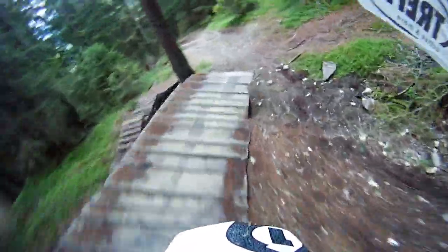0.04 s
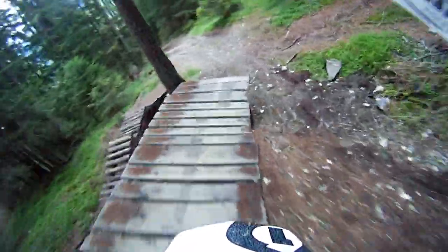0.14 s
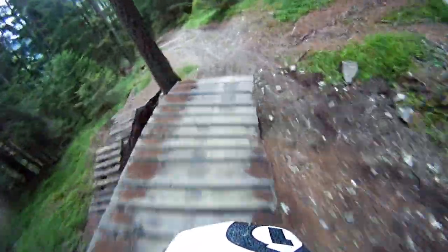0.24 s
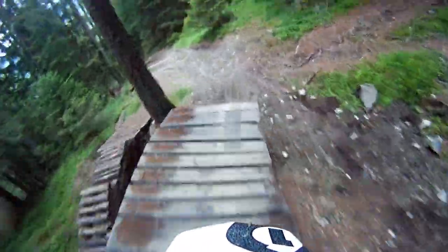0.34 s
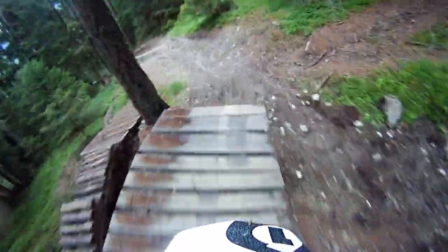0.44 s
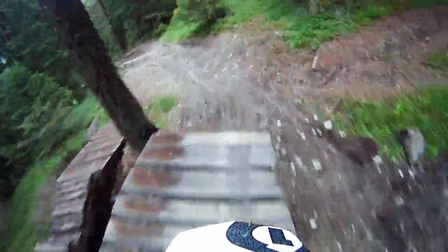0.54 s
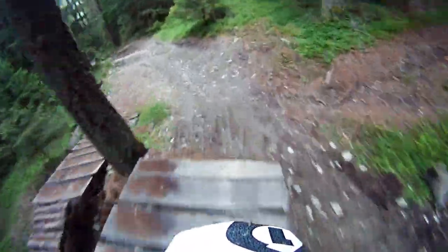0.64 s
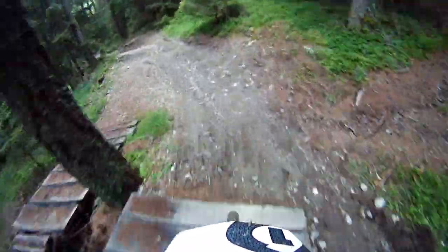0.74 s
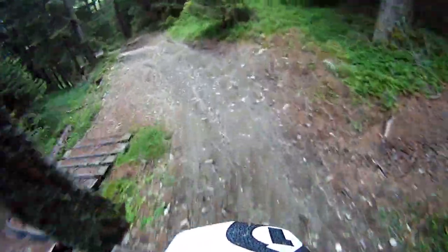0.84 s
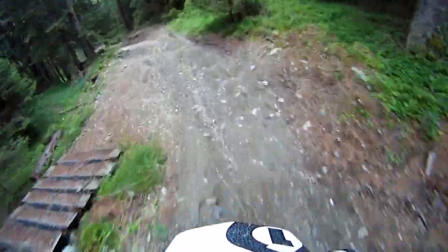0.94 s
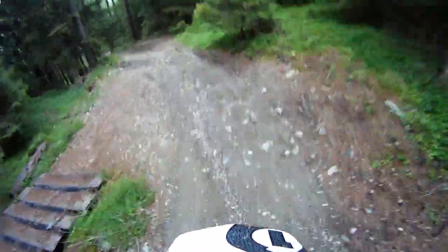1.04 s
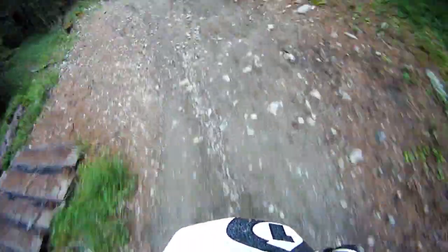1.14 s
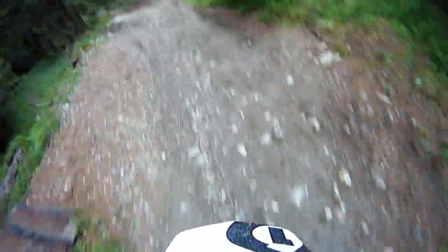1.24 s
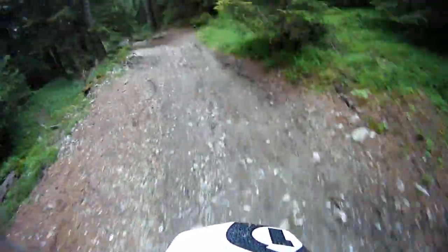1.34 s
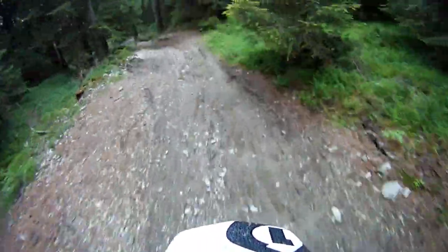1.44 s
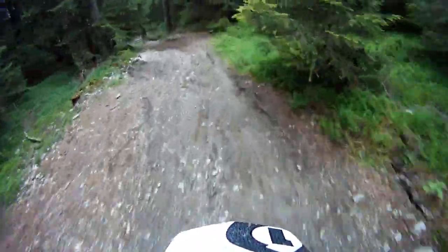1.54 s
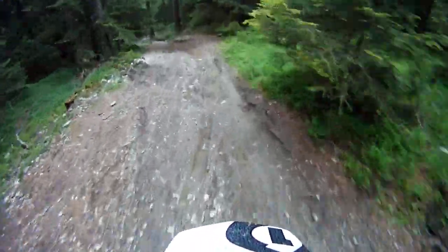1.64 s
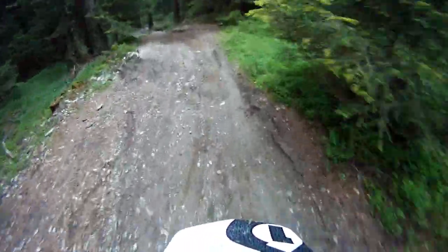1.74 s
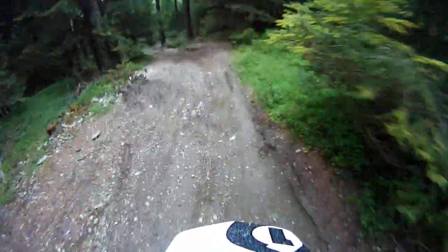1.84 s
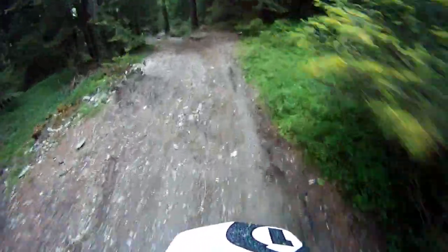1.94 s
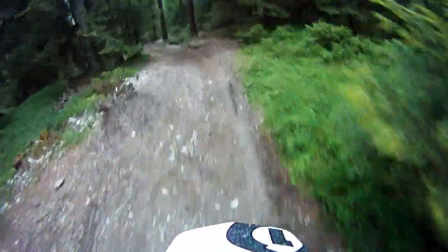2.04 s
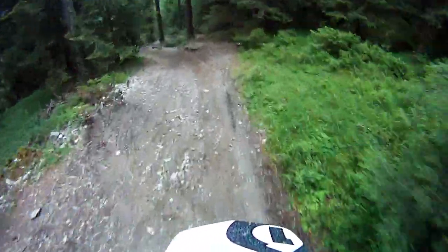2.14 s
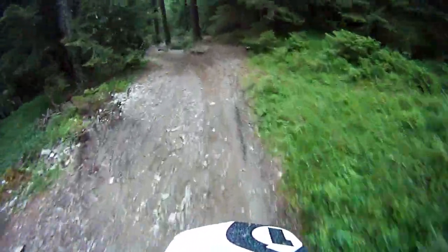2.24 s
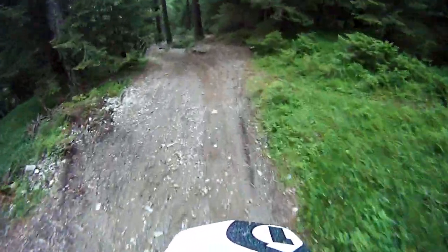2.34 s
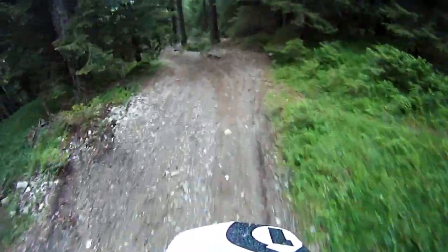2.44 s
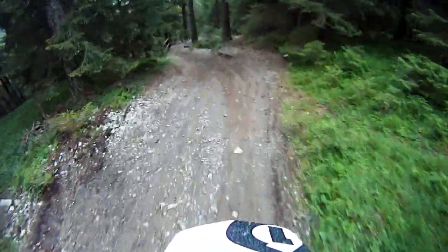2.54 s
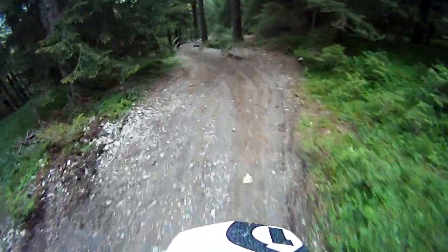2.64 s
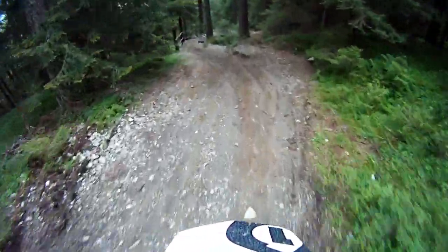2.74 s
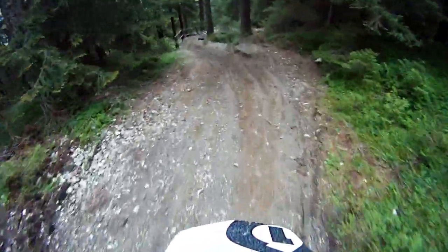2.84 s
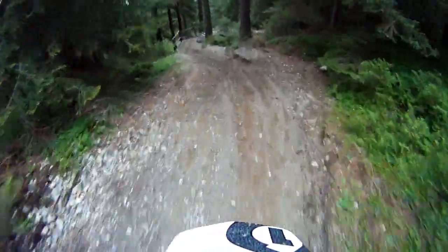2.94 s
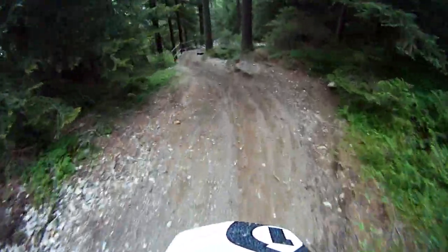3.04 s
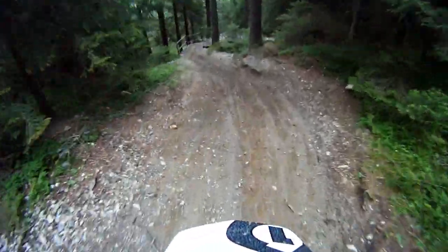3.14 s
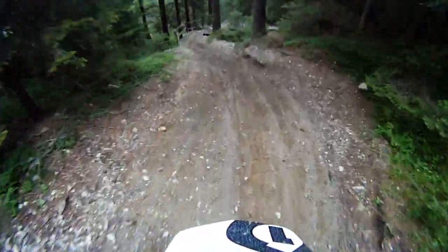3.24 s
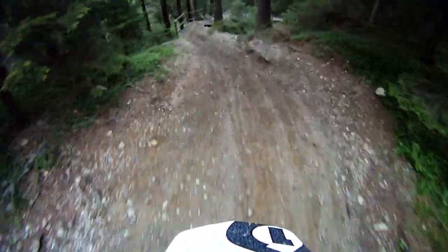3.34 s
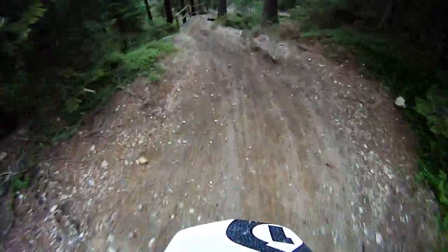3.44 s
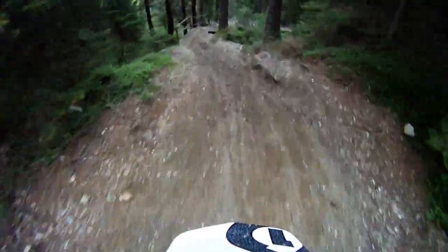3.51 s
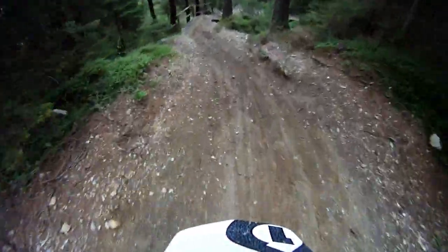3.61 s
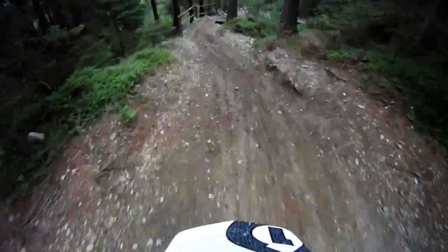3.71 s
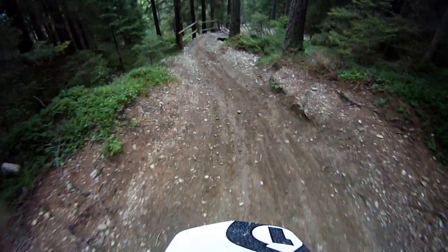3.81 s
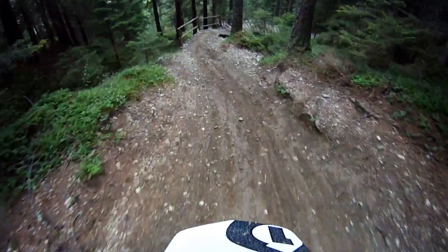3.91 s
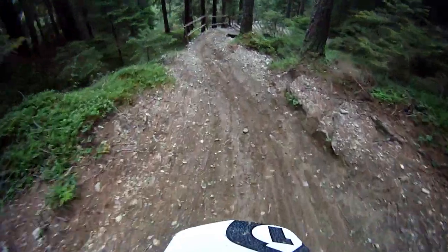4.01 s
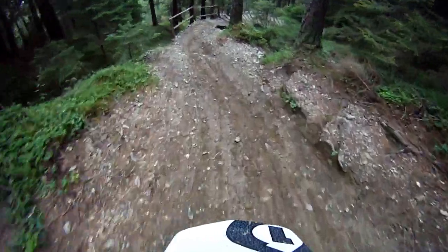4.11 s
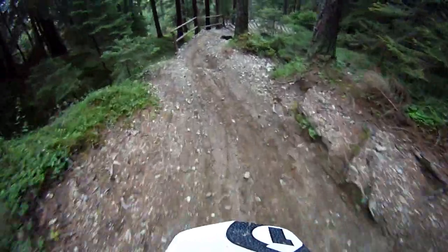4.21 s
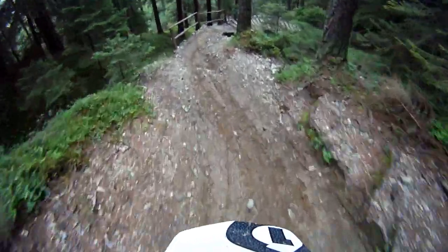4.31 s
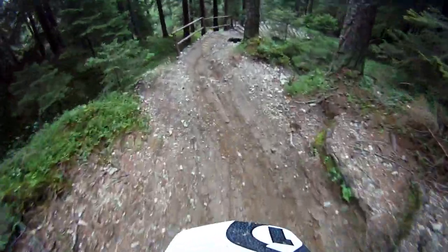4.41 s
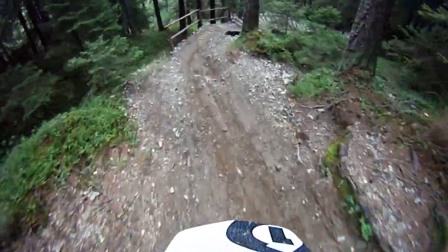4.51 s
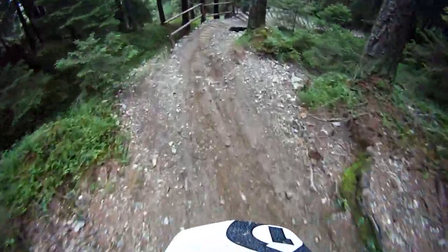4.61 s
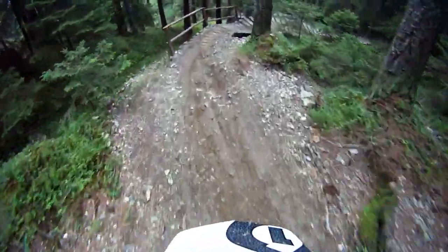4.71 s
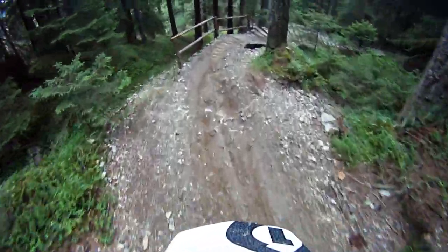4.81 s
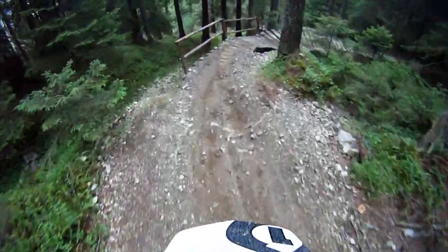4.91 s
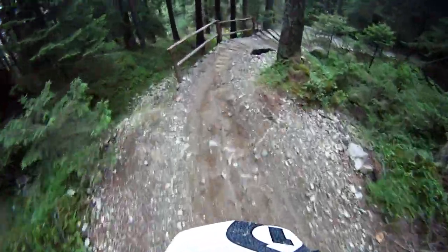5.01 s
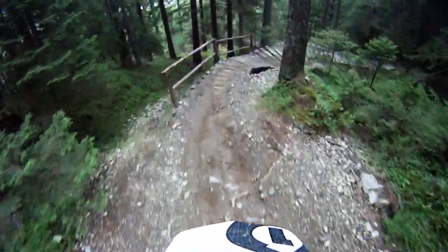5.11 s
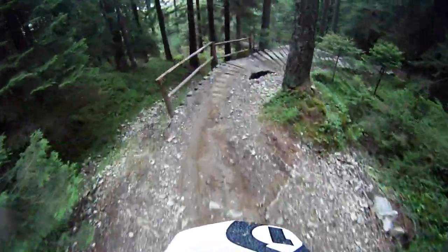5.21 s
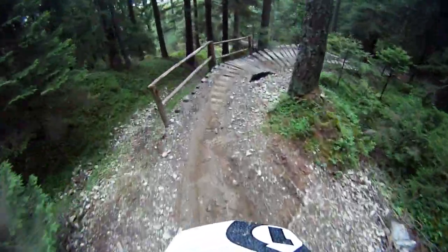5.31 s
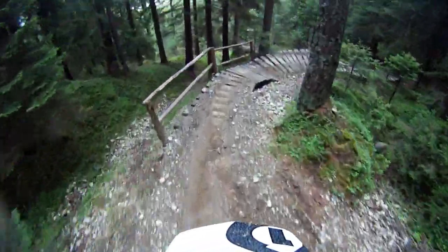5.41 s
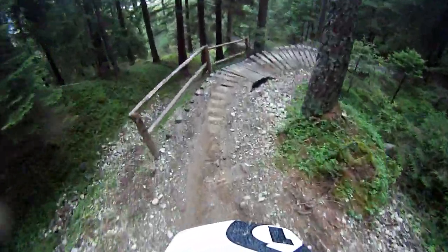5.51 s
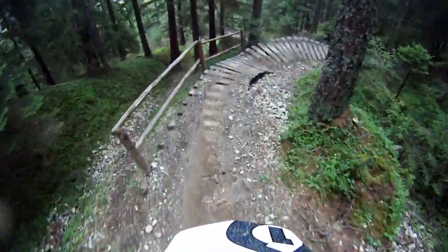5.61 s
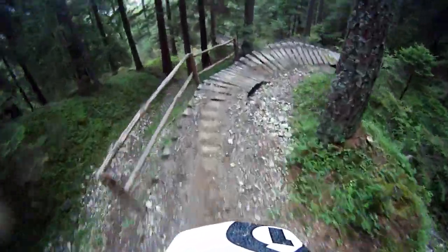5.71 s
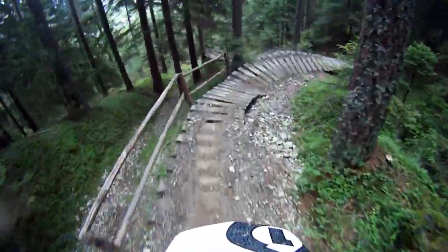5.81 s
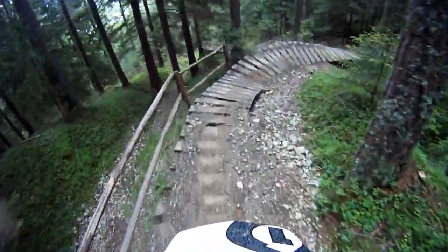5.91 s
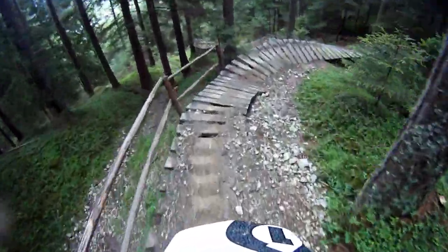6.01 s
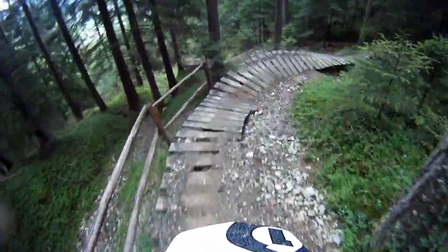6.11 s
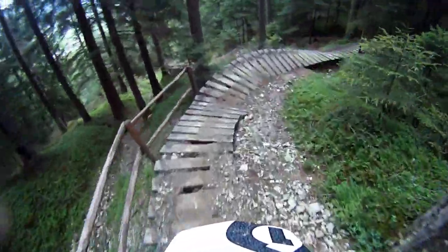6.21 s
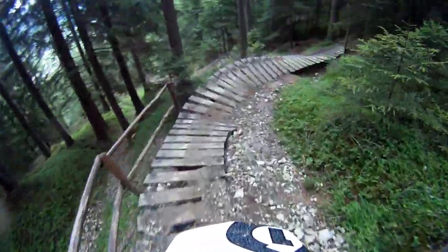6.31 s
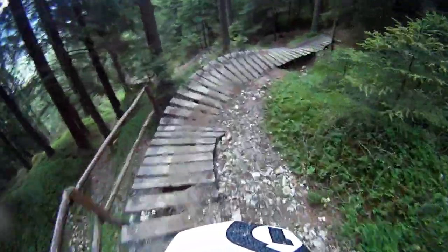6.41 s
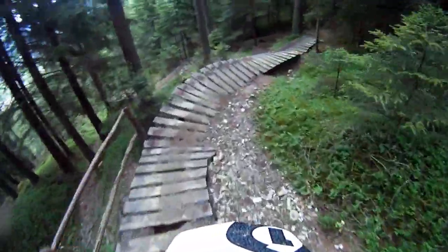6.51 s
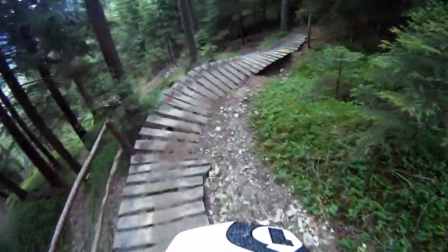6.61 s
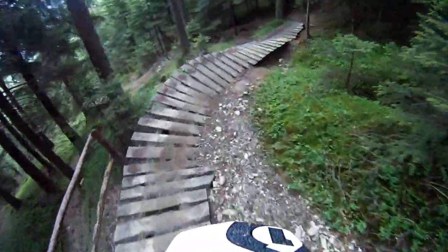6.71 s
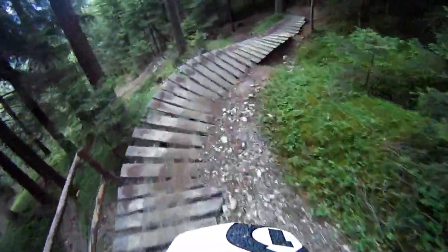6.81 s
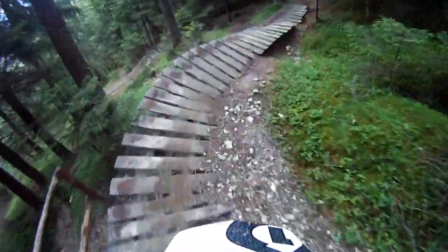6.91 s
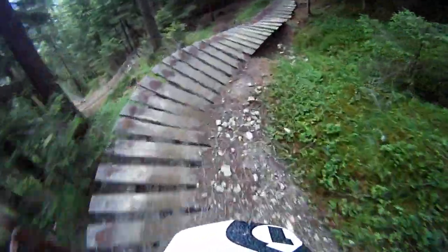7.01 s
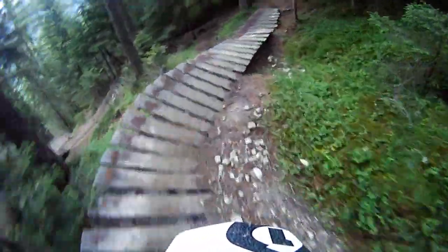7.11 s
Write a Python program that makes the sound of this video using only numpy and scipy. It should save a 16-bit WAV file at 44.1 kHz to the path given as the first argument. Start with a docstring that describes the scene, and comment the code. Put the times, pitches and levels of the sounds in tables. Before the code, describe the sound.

Close helmet microphone on a mountain bike outdoors in forest. Soft, quick ribbed bumps over a wooden ramp, a brief lull, then a loud clack of landing with two low thuds. Tyres crunch gravel, chain and frame rattle, stones clink and air rumbles. A ringing knock comes a second later; the ride grows quieter before wooden planks boom and clatter at the end.

```python
"""A mountain bike, heard from the rider's helmet, drops off a wooden ramp, lands with a clack and two low
thuds, and runs down a gravel trail onto a boardwalk. Parts are noise contacts driven through resonances.
One jolt signal shakes the helmet, loads the tyres and rattles chain and frame. Tyres crunch over grit and
flick stones, the hub rings, and air rumbles past the microphone as shaped, fluttering noise."""
import sys
import numpy as np
from scipy import signal
from scipy.fft import rfft, irfft, next_fast_len
from scipy.io import wavfile
from scipy.ndimage import uniform_filter1d

SR = 44100
rng = np.random.default_rng(int(sys.argv[2]) if len(sys.argv) > 2 else 0)


def to_wav(sig):
    """Store sig (one row per channel, or 1-D mono) as 16-bit WAV at the path in sys.argv[1].

    Samples outside -1..1 are clipped; the rate is SR.
    """
    pcm = np.clip(np.atleast_2d(sig), -1, 1) * 32767
    pcm = np.round(pcm).astype(np.int16)
    wavfile.write(sys.argv[1], SR, pcm.T)  # frames by channels


N = 315315
T = np.arange(N) / SR

# Table columns: level_db is final at its source; rel_db is scaled or normalised later.
# half_power_s is the time between a swell's half-power points.


def from_db(db):
    """Decibels to gain."""
    return 10 ** (np.asarray(db) / 20)


def rms_one(x):
    """Scale to unit power."""
    return x / np.sqrt(np.mean(x ** 2) + 1e-20)


def gains(rows):
    """Each dB column of a curve as a gain per sample."""
    s, *columns = np.transpose(rows)
    return [from_db(np.interp(T, s, column)) for column in columns]


def swells(rows, skirt):
    """Amplitude of a row of shakes; each rises and falls about its peak, and their powers add."""
    power = np.zeros(N)
    for peak_s, level_db, half_power_s in rows:
        first = max(int((peak_s - 6 * half_power_s) * SR), 0)
        near = slice(first, int((peak_s + 6 * half_power_s) * SR))
        distance = np.abs(2 * (T[near] - peak_s) / half_power_s)
        power[near] += from_db(level_db) ** 2 * .5 ** (distance ** skirt)
    return np.sqrt(power)


def tilt(x, spectrum):
    """Pass a sound through a smooth frequency response that falls away beyond its ends."""
    hz, db = np.transpose(spectrum)
    size = next_fast_len(N)
    log_hz = np.log(np.maximum(np.arange(size // 2 + 1) * SR / size, 1))
    beyond = np.abs(log_hz - np.clip(log_hz, np.log(hz[0]), np.log(hz[-1])))
    response = from_db(np.interp(log_hz, np.log(hz), db)) * np.exp(-2 * beyond)
    return irfft(rfft(x, size) * response, size)[..., :N]


def colour(x, spectrum):
    """Give a noise a spectrum and unit power."""
    return rms_one(tilt(x, spectrum))


def resonate(x, modes, direct_db):
    """Dense contacts drive many resonances, whose powers add to a share of the bare contact."""
    size = next_fast_len(N)
    f = np.arange(size // 2 + 1) * SR / size
    power = from_db(direct_db) ** 2
    for hz, width_hz, rel_db in modes:
        power = power + (from_db(rel_db) / (1 + (2 * (f - hz) / width_hz) ** 2)) ** 2
    return rms_one(irfft(rfft(x, size) * np.sqrt(power), size)[..., :N])


def smooth_power(x, span_s):
    """Running mean power, smoothed twice."""
    size = max(int(span_s * SR), 2)
    return uniform_filter1d(uniform_filter1d(x ** 2, size), size)


def steady(x, span_s):
    """Even out the power, so that the driving force sets the level."""
    return x / np.sqrt(smooth_power(x, span_s) + 1e-9)


def turbulence():
    """Two unrelated white noises: common to both ports, and differing between them."""
    return rng.standard_normal((2, N))


def grains(per_s, spread_db):
    """Tiny contacts at random moments, a few far stronger (weaker if spread_db < 0) than the rest."""
    born = rng.random(N) < per_s / SR
    strength = from_db(spread_db * np.minimum(rng.exponential(1, N), 4))
    return rms_one(born * strength * turbulence())


def flutter(depth_db, step_s):
    """A gain that wanders at random from one moment to the next."""
    steps = rng.standard_normal(4000)
    return from_db(depth_db * np.interp(T / step_s, np.arange(len(steps)), steps))


def scattered(per_s, half_power_s, spread_db):
    """Amplitude of small shakes that come at random moments."""
    gap, force = rng.random(size=(150, 2)).T
    when = np.cumsum((.5 + gap) / per_s)
    rows = [(s, -spread_db * f, half_power_s) for s, f in zip(when, force) if s < N / SR]
    return swells(rows, skirt=2)


def pings(rows, rise_s, ring_s, overtone_db, width_hz):
    """Each ping swells in softly and rings roughly, at its pitch and at a few unrelated partials."""
    out = np.zeros((2, N))
    t = np.arange(-SR // 25, SR // 16) / SR
    shape = np.exp(np.minimum(t / rise_s, -t / ring_s))
    for peak_s, level_db, pitch_hz in rows:
        partials_hz = pitch_hz * np.r_[1, rng.uniform(.7, 1.6, size=4)]
        sizes = from_db(np.r_[0, np.full(4, overtone_db)])
        # a wandering phase widens each partial
        wander = np.cumsum(rng.standard_normal((len(partials_hz), len(t))), axis=1)
        wander = uniform_filter1d(wander * np.sqrt(2 * np.pi * width_hz / SR), size=64)
        waves = np.exp(2j * np.pi * partials_hz[:, None] * t + 1j * wander)
        weights = sizes * np.exp(2j * np.pi * rng.random((2, len(partials_hz))))
        ring = from_db(level_db) * shape * (weights @ waves).real
        at = int(peak_s * SR) + np.round(t * SR).astype(int)
        inside = (at >= 0) & (at < N)
        out[:, at[inside]] += ring[:, inside]
    return out


# big bumps that shake the helmet: peak_s, rel_db, half_power_s
BUMPS = [(0.165, -50, 0.028), (0.28, -46.5, 0.021), (0.33, -52, 0.023), (0.496, -48, 0.025),
         (0.644, -51.5, 0.025), (0.701, -47, 0.021), (1.12, -36.5, 0.028), (1.174, -35.5, 0.027),
         (1.379, -40.5, 0.0067), (1.427, -42, 0.0082), (1.635, -41.5, 0.02), (1.775, -37, 0.025),
         (1.846, -42, 0.062), (1.935, -41, 0.019), (2.001, -38.5, 0.0078), (2.042, -39, 0.029),
         (2.135, -46, 0.044), (2.307, -49.5, 0.062), (2.371, -47, 0.015), (2.634, -41, 0.037),
         (2.733, -42, 0.02), (2.786, -41.5, 0.015), (2.905, -39, 0.039), (3.04, -43.5, 0.031),
         (3.149, -43, 0.058), (3.235, -37, 0.051), (3.48, -43, 0.042), (3.613, -38.5, 0.02),
         (3.655, -39, 0.038), (3.708, -40, 0.03), (3.756, -43.5, 0.018), (3.853, -41, 0.02),
         (3.915, -45.5, 0.02), (4.012, -44, 0.01), (4.119, -40, 0.029), (4.181, -42, 0.01),
         (4.267, -48, 0.024), (4.526, -38.5, 0.017), (4.581, -41, 0.0055), (4.641, -45.5, 0.013),
         (4.964, -45.5, 0.023), (5.02, -51.5, 0.03), (5.478, -52.5, 0.027), (5.549, -53.5, 0.015),
         (5.776, -46, 0.01), (5.925, -41, 0.014), (6.088, -55.5, 0.028), (6.605, -52, 0.026)]
# evenly spaced ribs, on the ramp and before the boardwalk: first_s, last_s, spacing_s, rel_db
RIBS = [(0.09, 0.82, 0.0695, -54), (5.785, 6.21, 0.0514, -52.5)]
RIB_HALF_POWER_S = .019
SMALL_BUMPS_PER_S, SMALL_BUMP_HALF_POWER_S = 7.1, .016
SMALL_BUMP_RE_RUSH_DB = 3.5   # strongest small bump, relative to the AIR rush column


def jolts():
    """How hard the trail hits the wheels: big bumps, rows of ribs and small random bumps."""
    rush = gains(AIR)[2]
    ribs = [(s, rel_db, RIB_HALF_POWER_S) for first_s, last_s, spacing_s, rel_db in RIBS
            for s in np.arange(first_s, last_s, spacing_s)]
    small = scattered(SMALL_BUMPS_PER_S, SMALL_BUMP_HALF_POWER_S, spread_db=4)
    small = from_db(SMALL_BUMP_RE_RUSH_DB) * rush * small
    return np.hypot(swells(BUMPS + ribs, skirt=1.8), small)


USUAL_JOLT_DB = -45   # a steady jolt of this size yields level_db in shaken()


def shaken(jolt, level_db, span_s, follows):
    """A part's motion: jolts spread over its response time; follows < 1 cushions hard ones."""
    power = smooth_power(jolt, span_s) / from_db(USUAL_JOLT_DB) ** 2
    return from_db(level_db) * np.maximum(power, 1e-12) ** (follows / 2)


# air past the helmet between bumps: time_s, sway_rel_db, gust_rel_db, rush_rel_db
AIR = [(0.0, -41, -58, -63), (0.46, -32, -53, -63.5), (0.9, -44.5, -56, -61.5), (1.15, -42, -47, -52),
       (1.57, -41, -51, -57), (1.89, -61, -49, -62), (2.29, -39, -52.5, -60), (3.05, -33.5, -47.5, -57),
       (3.44, -34.5, -52, -62.5), (3.76, -42, -53, -60.5), (4.22, -47.5, -52, -66),
       (4.98, -42.5, -58.5, -64), (5.26, -49.5, -57, -62), (5.77, -43, -55.5, -67.5),
       (5.93, -40.5, -66, -75), (6.39, -49, -59, -63), (6.79, -40, -54, -62.5), (7.15, -30.5, -41, -51.5)]
# spectra of the three air layers: freq_hz, rel_db_per_hz
SWAY_COLOUR = [(10, -12.5), (19, -2.5), (28, -0.5), (38, -15.5), (55, -12.5), (80, -29.5), (140, -55)]
GUST_COLOUR = [(35, -16), (62, -2), (90, -6.5), (130, -12.5), (200, -23.5), (400, -60)]
RUSH_COLOUR = [(70, -12.5), (160, -9), (280, -7), (500, -15.5), (1000, -15.5), (1600, -22), (2600, -34),
               (3200, -32.5), (6000, -35.5), (14000, -47)]


def wind(jolt):
    """Slow sway of the helmet, gusts on the ports and a rush of air; every jolt raises all three."""
    sway, gust, rush = gains(AIR)
    sway = np.hypot(from_db(-.5) * sway, shaken(jolt, level_db=-32.5, span_s=.058, follows=1))
    gust = np.hypot(from_db(-2.5) * gust, shaken(jolt, level_db=-48.5, span_s=.028, follows=.95))
    rush = np.hypot(from_db(.5) * rush, shaken(jolt, level_db=-58.5, span_s=.075, follows=.49))
    eddies = flutter(depth_db=2.5, step_s=.018)
    sway_noise = steady(colour(turbulence(), SWAY_COLOUR), span_s=.078)
    gust_noise = steady(colour(turbulence(), GUST_COLOUR), span_s=.0077)
    low = sway * flutter(depth_db=3.5, step_s=.05) * sway_noise
    gusts = gust * flutter(depth_db=3.5, step_s=.026) * gust_noise
    air = rush * colour(grains(per_s=4600, spread_db=1), RUSH_COLOUR)
    return low + eddies * (gusts + air)


# ring of the coasting hub: time_s, rel_db
HUB = [(0, -70.5), (1.5, -64.5), (2.5, -65.5), (3.1, -61), (3.8, -65), (4.2, -66), (4.32, -60), (4.55, -59),
       (4.85, -64.5), (5.12, -65), (5.4, -70), (5.75, -64.5), (6.4, -72), (7.15, -73)]
# hub resonances: freq_hz, width_hz, rel_db
HUB_MODES = [(1998, 150, 1), (2210, 150, -5)]


def freewheel():
    """Dense pawl contacts ring the coasting hub's resonances in a quick, uneven flutter."""
    ring, = gains(HUB)
    pawls = resonate(grains(per_s=1500, spread_db=1), HUB_MODES, direct_db=-61.5)
    unevenness = flutter(depth_db=2.6, step_s=.018)
    return from_db(1.5) * ring * unevenness * steady(pawls, span_s=.046)


# larger stones flicked against the bike: peak_s, rel_db, pitch_hz
STONES = [(1.25, -53, 2090), (1.262, -54, 2410), (1.341, -51, 980), (1.858, -47, 1174),
          (1.866, -48.5, 1970), (2.183, -53, 1394), (3.431, -53, 1930), (3.608, -53, 1100),
          (4.034, -49.5, 1467), (4.522, -49.5, 1920), (5.172, -56, 1280), (5.75, -60, 1607),
          (5.912, -56.5, 2210)]


def stones():
    """Larger stones clink on rims and frame as short clusters of broadened partials."""
    return from_db(4) * pings(STONES, rise_s=.014, ring_s=.014, overtone_db=-7, width_hz=36)


# tyre crunch set by the ground: time_s, rel_db
GROUND = [(0.0, -71), (0.14, -67), (0.3, -68), (0.69, -69.5), (0.96, -61), (1.19, -59), (1.41, -63),
          (1.95, -61.5), (2.27, -59.5), (3.92, -59), (5.28, -64.5), (5.99, -68), (6.49, -67), (7.15, -61.5)]
# spectra of tread and grit: freq_hz, rel_db_per_hz
TYRE_COLOUR = [(700, -29), (1400, -6.5), (1750, -1), (2020, 1), (2250, -3), (2550, -0.5), (2900, -12),
               (3250, -21.5), (3700, -11.5), (4300, -26.5), (9000, -40)]
GRIT_COLOUR = [(2000, -24), (3000, 8.5), (3700, 9), (4300, 2), (5000, 0.5), (5900, -12.5), (7100, -1.5),
               (9000, 2), (10000, 9.5), (10600, -2.5), (12600, -11.5), (13500, 1), (14100, 5.5),
               (14700, -32.5)]
LOAD_CRUNCH_DB = -65.5   # extra crunch as the tyre presses into a usual bump
TICKS_PER_S, TICK_RE_CRUNCH_DB = 90, -13.5   # single bits of gravel cracking


def tyres(jolt):
    """Knobs crush dirt in uneven bites; the crunch sprays grit, cracks gravel and clinks pebbles."""
    crunch, = gains(GROUND)
    crunch = np.hypot(crunch, shaken(jolt, level_db=LOAD_CRUNCH_DB, span_s=.022, follows=.82))
    bites = flutter(depth_db=1.26, step_s=.073)
    tread = from_db(-.5) * colour(grains(per_s=6100, spread_db=-3.5), TYRE_COLOUR)
    spray = from_db(-4.5) * colour(grains(per_s=9700, spread_db=-.5), GRIT_COLOUR)
    ticks = resonate(grains(per_s=TICKS_PER_S, spread_db=1), FRAME_MODES, direct_db=-33)
    ticks = from_db(TICK_RE_CRUNCH_DB) * ticks
    when, force, bulk = rng.random(size=(200, 3)).T
    pebbles = np.c_[when * N / SR, -11 * force, 1100 * 2.3 ** bulk]   # peak_s, rel_db, pitch_hz
    clinks = from_db(4) * pings(pebbles, rise_s=.004, ring_s=.0061, overtone_db=-10, width_hz=21)
    return crunch * (bites * (tread + spray) + ticks + clinks)


# big shakes of chain and frame: peak_s, rel_db, half_power_s
RATTLES = [(0.221, -54.5, 0.03), (0.39, -58, 0.076), (0.897, -59.5, 0.021), (1.253, -56, 0.019),
           (1.345, -48, 0.035), (1.417, -56.5, 0.022), (1.489, -57.5, 0.018), (1.62, -56, 0.055),
           (1.697, -49.5, 0.03), (1.858, -46.5, 0.024), (2.351, -53, 0.013), (2.545, -55.5, 0.049),
           (2.64, -54, 0.042), (2.738, -52.5, 0.031), (3.022, -50, 0.018), (3.126, -48.5, 0.023),
           (3.268, -48, 0.032), (3.427, -53, 0.033), (3.564, -54, 0.067), (3.838, -51.5, 0.027),
           (4.034, -48.5, 0.044), (4.299, -61, 0.011), (4.41, -58, 0.023), (4.47, -56, 0.036),
           (4.96, -60, 0.023), (5.168, -63, 0.034), (5.389, -62.5, 0.028), (5.502, -56.5, 0.055),
           (5.787, -52.5, 0.054), (5.91, -62, 0.045), (6.13, -63.5, 0.11), (6.598, -62, 0.037),
           (6.683, -59, 0.03), (6.768, -58, 0.047), (6.932, -51, 0.09), (7.037, -53, 0.026)]
# frame resonances: freq_hz, width_hz, rel_db
FRAME_MODES = [(1580, 94, 2.5), (2295, 820, 4.5), (3680, 410, 5.5), (4940, 730, 0.5), (6980, 720, -2.5),
               (8380, 290, 0), (9720, 1000, -7), (13600, 500, -11.5)]
FLURRIES_PER_S, FLURRY_RE_CRUNCH_DB, FLURRY_HALF_POWER_S = 7, -4, .025   # small shakes


def rattle(jolt):
    """Chain and cables chatter on the frame in big shakes, small flurries and with every jolt."""
    crunch, = gains(GROUND)
    chatter = resonate(grains(per_s=15000, spread_db=2.2), FRAME_MODES, direct_db=-38)
    big = swells(RATTLES, skirt=3)
    flurries = scattered(FLURRIES_PER_S, FLURRY_HALF_POWER_S, spread_db=10.5)
    flurries = from_db(FLURRY_RE_CRUNCH_DB) * crunch * flurries
    jolted = shaken(jolt, level_db=-66.5, span_s=.03, follows=.58)
    return from_db(-.5) * np.sqrt(big ** 2 + flurries ** 2 + jolted ** 2) * chatter


# wheels on the boardwalk planks: peak_s, level_db, half_power_s
PLANKS = [(6.857, -41.5, 0.03), (6.928, -36.5, 0.027), (6.986, -40.5, 0.01), (7.034, -35.5, 0.031),
          (7.145, -39, 0.024)]
# plank resonances: freq_hz, width_hz, rel_db
PLANK_MODES = [(114, 52, 2.5), (160, 51, 8.5), (345, 200, -8), (712, 90, -6.5), (940, 130, -7.5),
               (1130, 110, -11.5), (1300, 160, -10), (1590, 120, -8.5), (1920, 90, -12), (2180, 180, -12.5),
               (2480, 130, -8.5), (3680, 190, -12.5)]


def boardwalk():
    """Each plank booms and clatters as contacts under the wheels drive its resonances."""
    wood = resonate(grains(per_s=3500, spread_db=2.5), PLANK_MODES, direct_db=-32)
    return swells(PLANKS, skirt=1.77) * steady(wood, span_s=.014)


# spectrum of a bump: freq_hz, rel_db_per_hz
BUMP_COLOUR = [(40, -20.5), (90, 2.5), (170, 5), (260, -6.5), (450, -10.5), (750, -14.5), (1200, -18),
               (2000, -22), (3000, -28), (6000, -35), (14000, -37)]


def bumps(jolt):
    """Each bump gives a dull, gritty puff that swells and fades softly."""
    puff = steady(colour(grains(per_s=6000, spread_db=2.5), BUMP_COLOUR), span_s=.0059)
    return from_db(-2) * jolt * puff


# suspension takes the weight: peak_s, level_db, half_power_s, pitch_hz
THUDS = [(1.127, -28, 0.0053, 191.1), (1.134, -23, 0.006, 165)]


def thuds():
    """After the landing the bike gives two low, round swings: sines under short swells."""
    out = np.zeros((2, N))
    for peak_s, level_db, half_power_s, pitch_hz in THUDS:
        phase = rng.uniform(0, 2 * np.pi, (2, 1))
        swing = np.sqrt(2) * np.sin(2 * np.pi * pitch_hz * T + phase)
        out += swells([(peak_s, level_db, half_power_s)], skirt=1.7) * swing
    return out


# loose part knocking on the trail: peak_s, rel_db, half_power_s
KNOCK = [(2.052, -46, 0.0086), (2.064, -26, 0.0058), (2.075, -25, 0.0056), (2.090, -42.5, 0.018)]
# its resonances: freq_hz, width_hz, rel_db
KNOCK_MODES = [(904, 120, -8.5), (1134, 83, -0.5), (1570, 300, -9.5), (1970, 120, -9.5), (2260, 90, -10),
               (2490, 220, -11.5), (3030, 210, -11), (3320, 71, -15), (3630, 370, -13.5),
               (8380, 280, -19.5), (9500, 1200, -25), (10840, 110, -17), (12900, 150, -20),
               (14200, 900, -26)]
# its ring: peak_s, level_db, pitch_hz
KNOCK_RING = [(2.064, -25, 1085)]


def loose_part():
    """A loose part slaps in a tight cluster of contacts and rings on."""
    knock = resonate(grains(per_s=14000, spread_db=3), KNOCK_MODES, direct_db=-42)
    knock = from_db(-3) * swells(KNOCK, skirt=.87) * steady(knock, span_s=.0051)
    ring = pings(KNOCK_RING, rise_s=.0058, ring_s=.011, overtone_db=-24, width_hz=5.6)
    return knock + ring


# hard contacts of the landing: peak_s, level_db, half_power_s
LANDING = [(1.028, -34, 0.019), (1.0425, -21, 0.011), (1.0505, -9, 0.0069), (1.0585, -9.5, 0.0024),
           (1.067, -10.5, 0.0052), (1.074, -22.5, 0.0052), (1.082, -23, 0.003)]
# resonances of the bike's parts: freq_hz, width_hz, rel_db
LANDING_MODES = [(517, 430, -15.5), (806, 200, -5), (944, 220, -7), (1273, 280, 3.5), (1400, 40, 1),
                 (1750, 360, -5), (2190, 480, -4), (2830, 800, -15), (3800, 340, -16), (9600, 840, -18.5),
                 (10460, 410, -15.5), (13600, 690, -18.5), (14200, 1000, -28)]


def landing():
    """Hard parts slap together in a tight cluster of contacts that drives their resonances."""
    clack = resonate(grains(per_s=14000, spread_db=1), LANDING_MODES, direct_db=-29)
    return swells(LANDING, skirt=1.21) * steady(clack, span_s=.006)


# difference between the two microphone ports: freq_hz, side_minus_mid_db
WIDTH = [(25, -61.5), (70, -37.5), (140, -18.5), (330, -18), (470, -3), (680, -13), (1200, -8.5),
         (2000, -11), (2400, -6), (3600, -5), (4500, -3), (7000, -4), (8400, -3), (9800, -12.5),
         (12000, -18.5), (14000, -6.5)]
PLANK_JOLT_DB, LANDING_JOLT_DB = -5, -25   # shares that reach the helmet


def scene():
    """Everything rides along with the microphone, in open air; lows reach both ports alike."""
    trail = jolts()
    plank_jolt = from_db(PLANK_JOLT_DB) * swells(PLANKS, skirt=1.1)
    landing_jolt = from_db(LANDING_JOLT_DB) * swells(LANDING, skirt=.53)
    jolt = trail + plank_jolt + landing_jolt
    riding = wind(jolt) + freewheel() + stones() + tyres(trail) + rattle(jolt) + boardwalk() + bumps(trail)
    riding = signal.sosfilt(signal.ellip(8, .1, 60, 14350, fs=SR, output="sos"), riding)
    mid, side = riding + thuds() + loose_part() + landing()
    return mid + tilt(side, WIDTH) * np.array([[1], [-1]])


def record(dry):
    """Round the highest peaks, then cut the top above 15.2 kHz."""
    rounded = .9 * np.tanh(dry / .9)
    return signal.sosfilt(signal.ellip(10, .1, 90, 15200, fs=SR, output="sos"), rounded)


dry = scene()
out = record(dry)
to_wav(out)
```